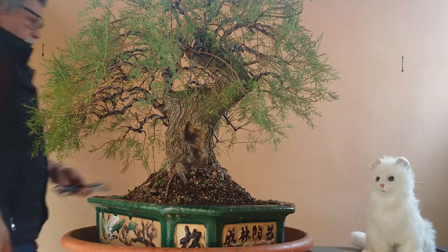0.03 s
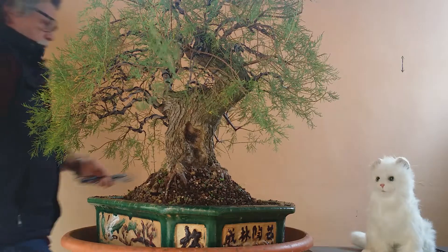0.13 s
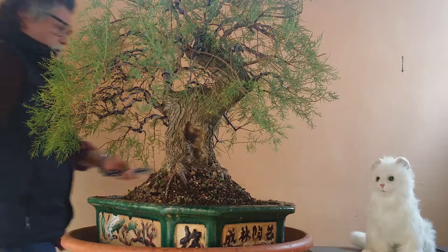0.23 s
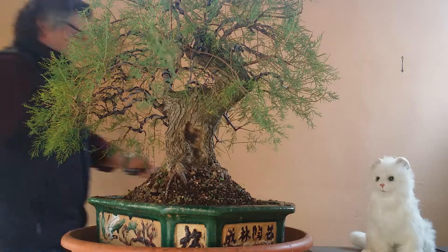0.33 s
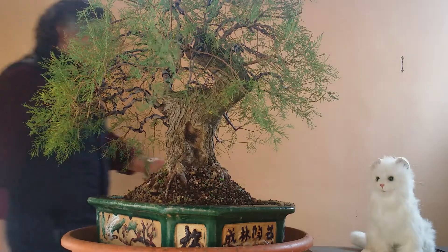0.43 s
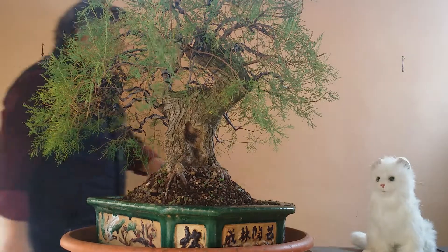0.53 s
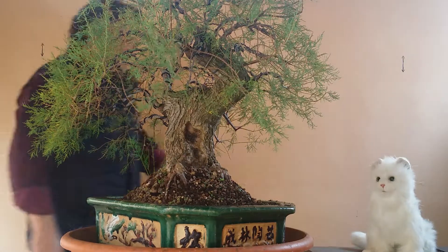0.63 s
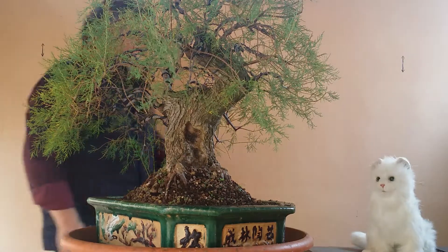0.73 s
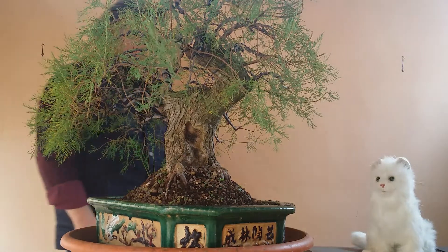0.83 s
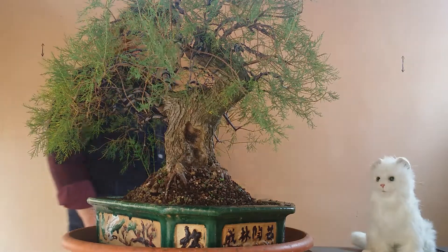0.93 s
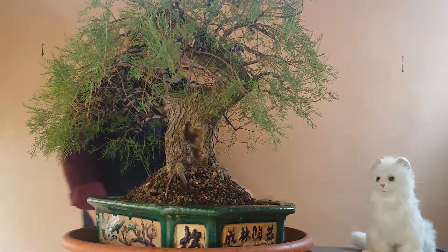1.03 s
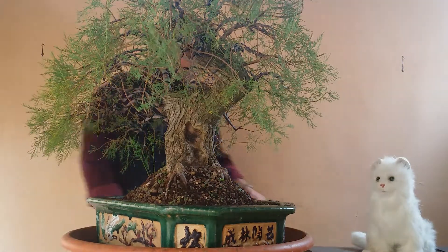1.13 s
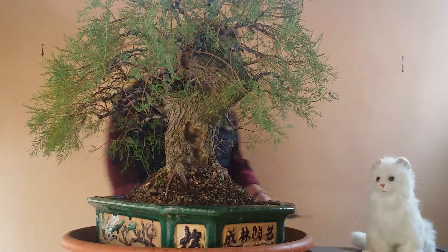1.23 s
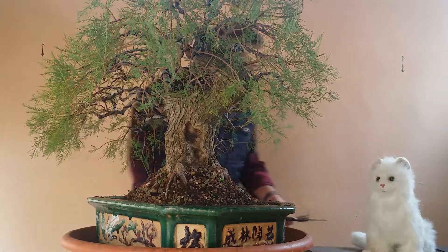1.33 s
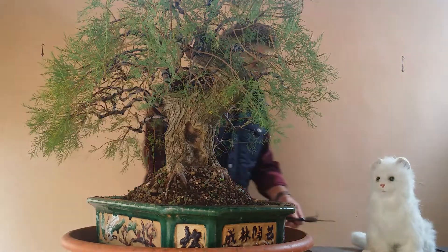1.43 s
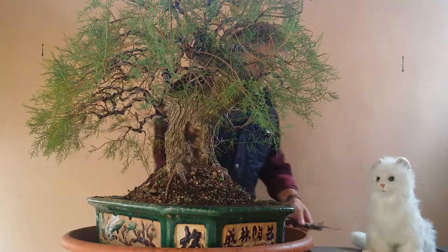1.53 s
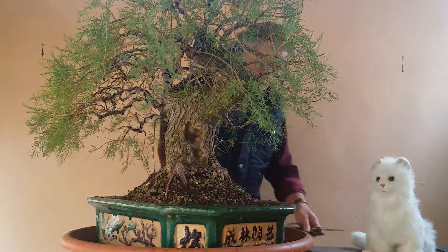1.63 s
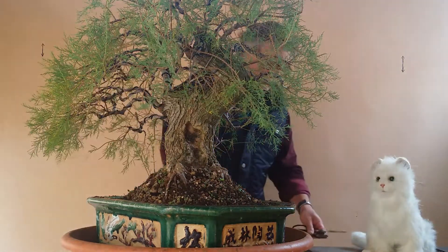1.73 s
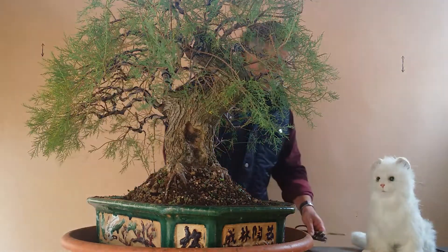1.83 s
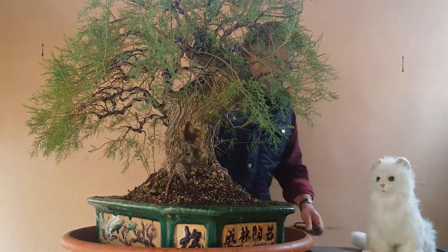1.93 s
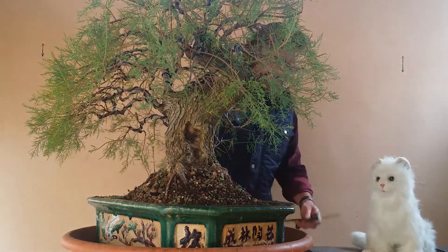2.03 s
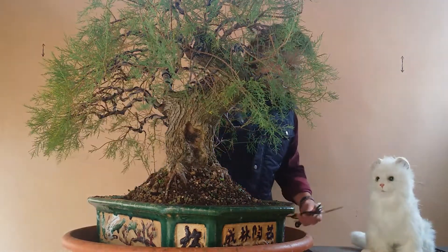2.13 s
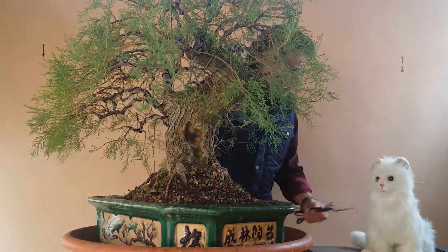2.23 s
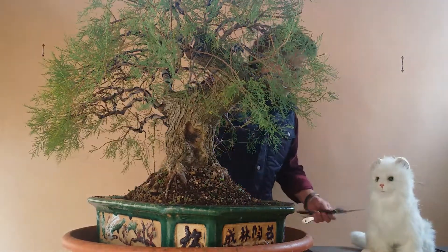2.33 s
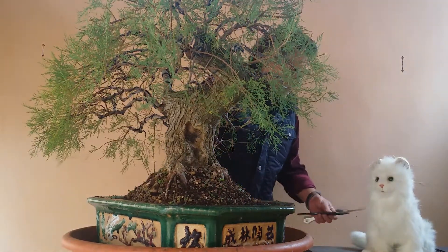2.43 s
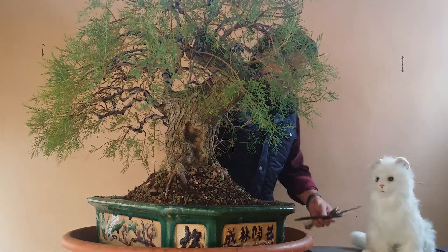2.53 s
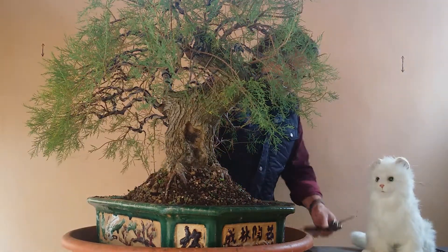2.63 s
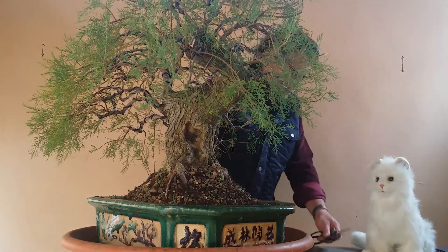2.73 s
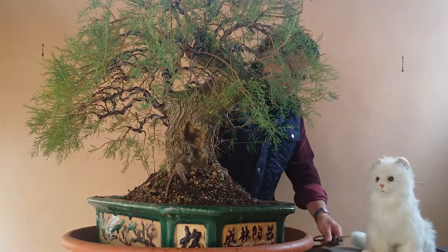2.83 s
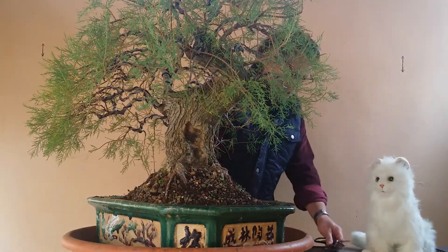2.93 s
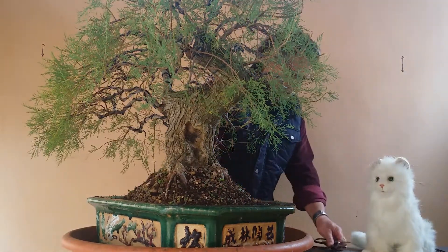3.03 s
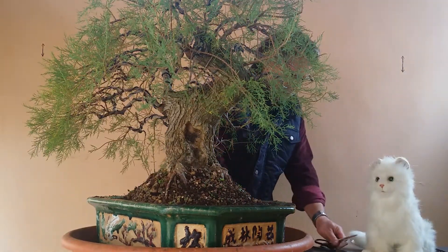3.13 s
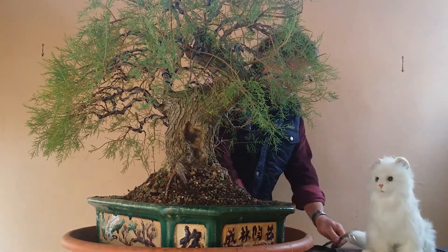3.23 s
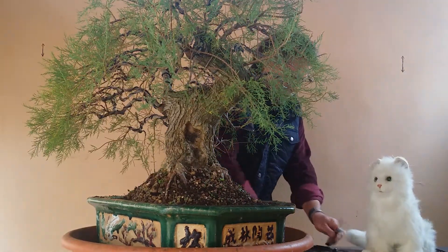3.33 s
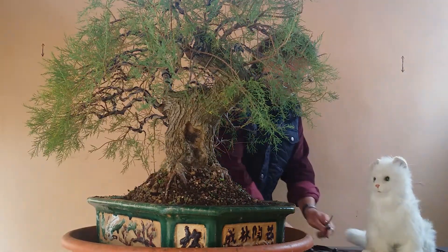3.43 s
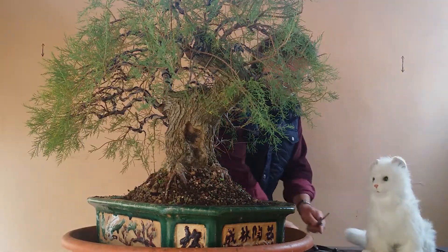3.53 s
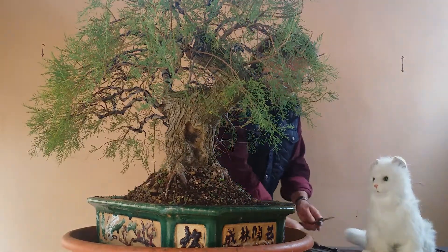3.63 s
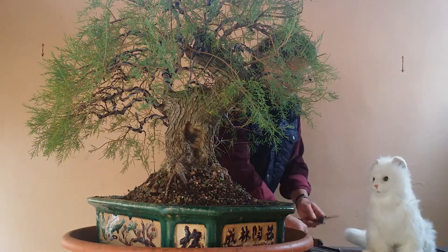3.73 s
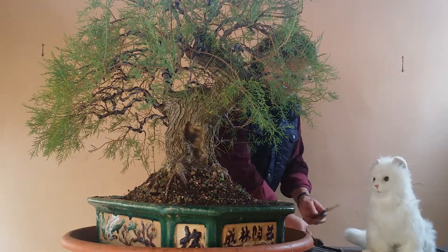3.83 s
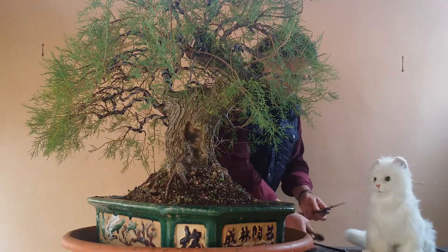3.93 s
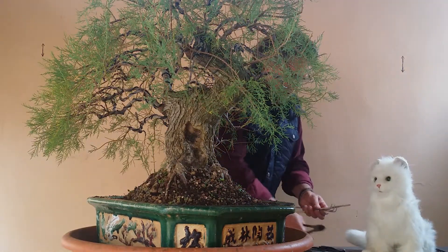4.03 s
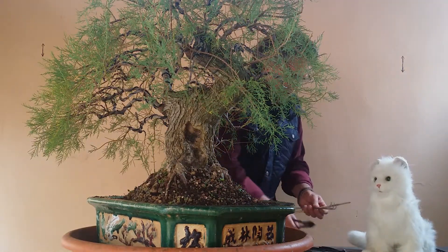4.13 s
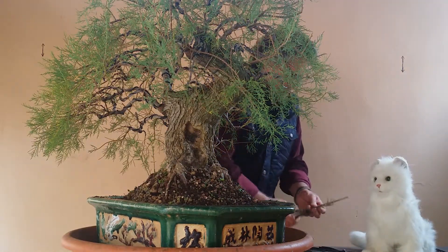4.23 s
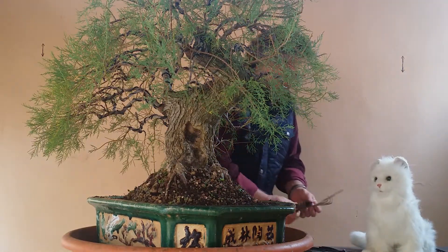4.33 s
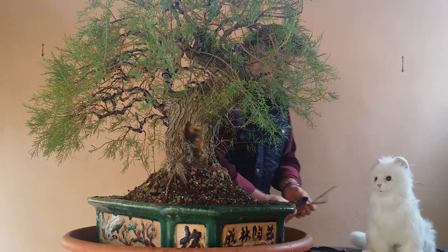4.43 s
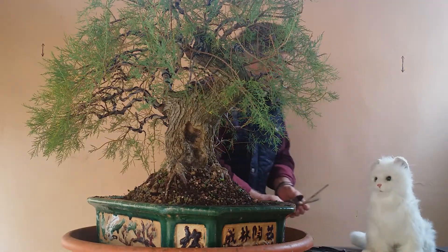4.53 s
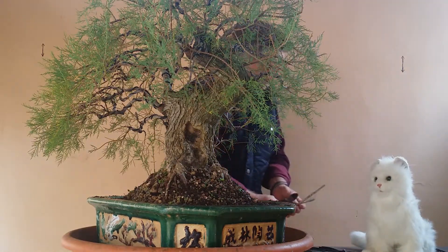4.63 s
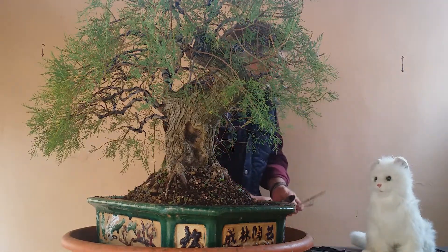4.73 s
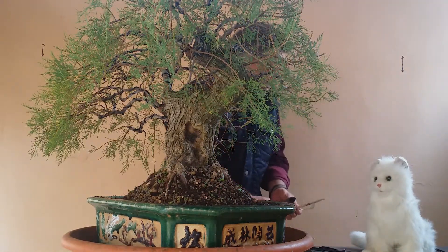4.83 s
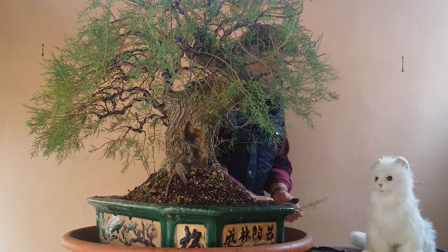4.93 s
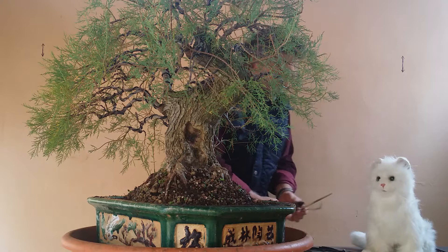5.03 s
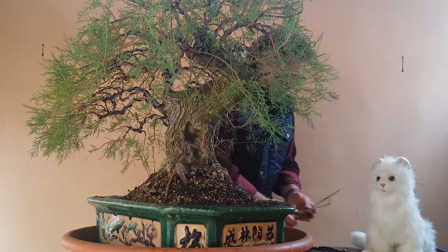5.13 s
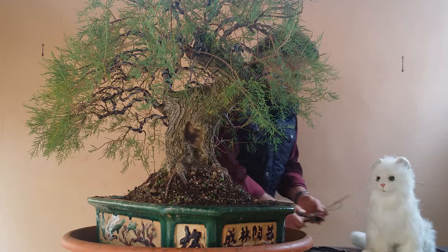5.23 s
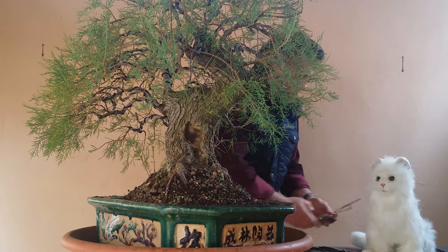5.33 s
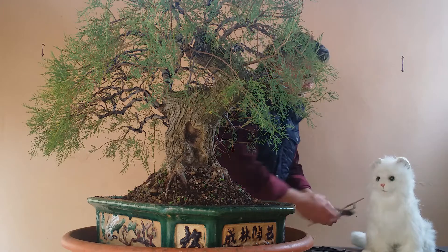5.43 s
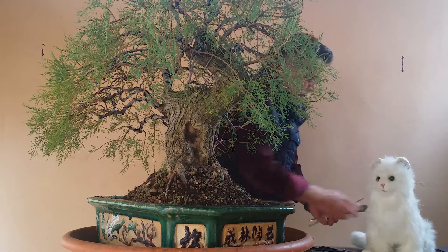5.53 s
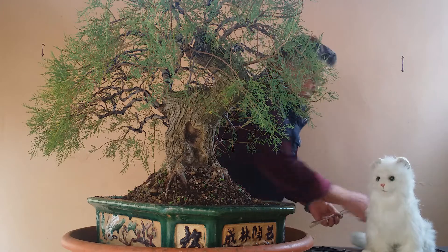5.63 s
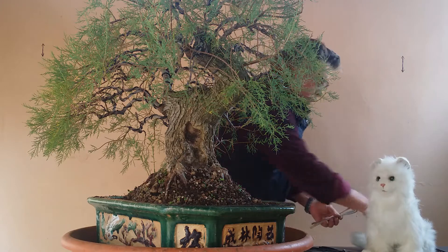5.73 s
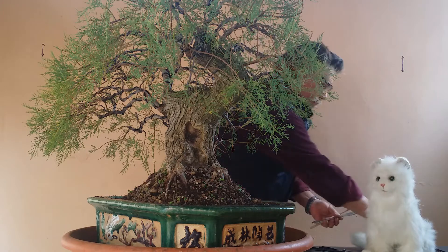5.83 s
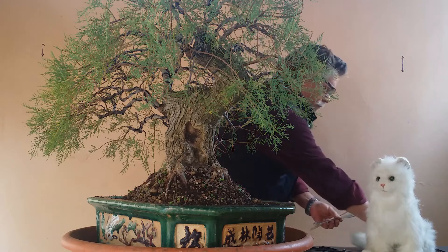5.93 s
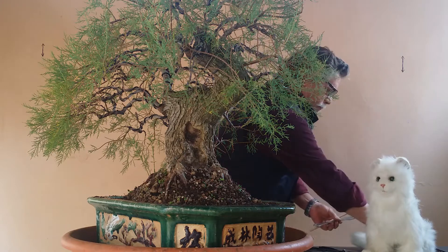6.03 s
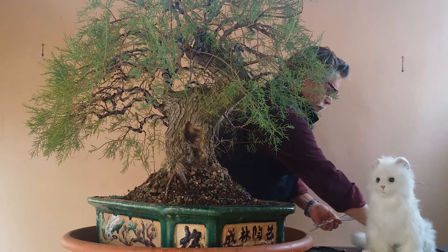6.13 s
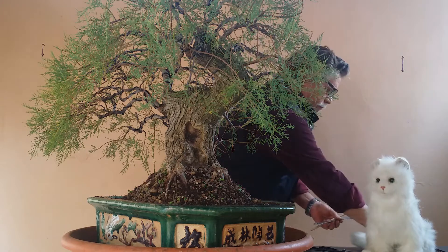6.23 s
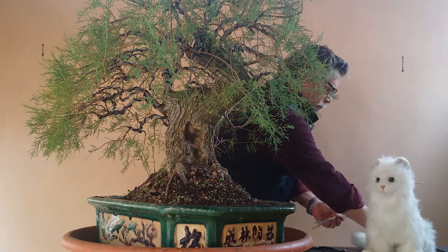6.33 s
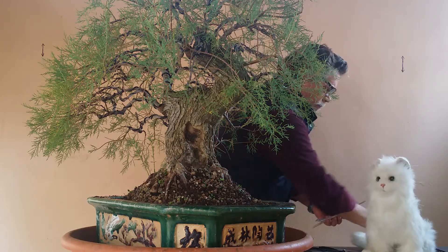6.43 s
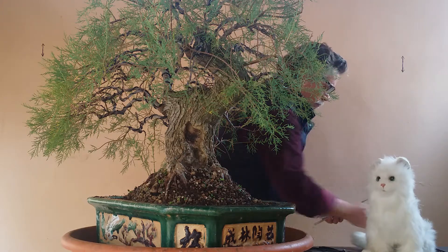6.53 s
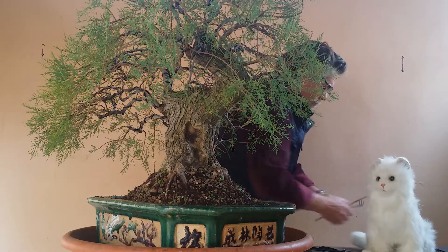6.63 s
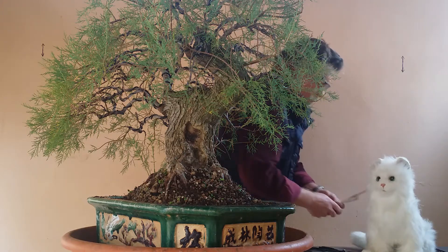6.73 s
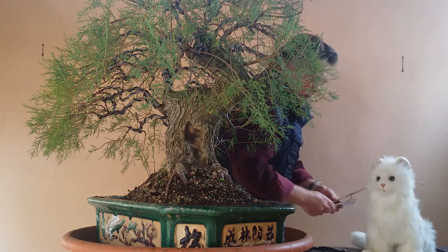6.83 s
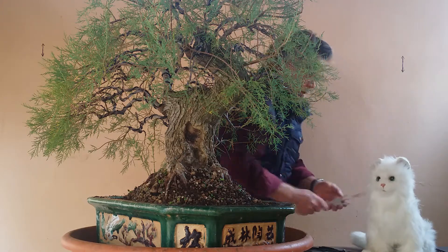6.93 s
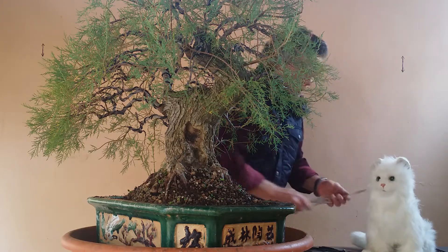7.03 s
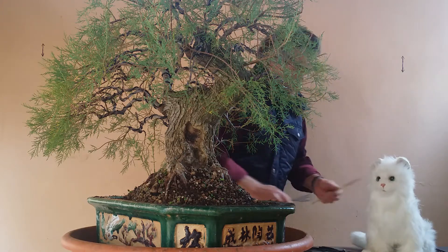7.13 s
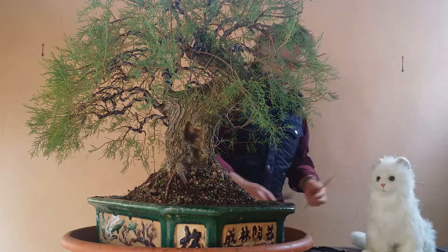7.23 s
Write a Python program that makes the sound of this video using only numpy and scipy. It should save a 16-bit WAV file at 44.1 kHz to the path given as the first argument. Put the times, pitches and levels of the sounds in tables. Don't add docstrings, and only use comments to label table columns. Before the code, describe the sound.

In a quiet bare room, small steel hand tools clink faintly, land on a wooden table, are lifted, slid together, then knocked sharply and loudly.

```python
import sys
import numpy as np
from scipy import signal
from scipy.fft import rfft, irfft, next_fast_len
from scipy.io import wavfile
from scipy.ndimage import uniform_filter1d, map_coordinates

SR = 44100
rng = np.random.default_rng(int(sys.argv[2]) if len(sys.argv) > 2 else 0)


def put_to_file(sound):
    columns = np.atleast_2d(sound).T
    safe = np.clip(columns, -1, 1)
    whole_steps = np.round(safe * 32767)
    wavfile.write(sys.argv[1], SR, whole_steps.astype(np.int16))


def linear_from_db(decibels):
    return 10 ** (np.asarray(decibels, float) / 20)


N = 321841

# frequency in Hz, density in dB per Hz.
RUMBLE_SPECTRUM = [(12, -34), (20, -5.5), (59, -4), (97, 1.5), (139, -5), (308, -7), (375, -12.5),
                   (450, -12), (580, -49), (990, -120)]
# frequency in Hz, density in dB per Hz.
SHUFFLE_SPECTRUM = [(240, -22.5), (400, -10), (533, -5.5), (575, -6), (945, -7), (3000, -17), (3900, -38),
                    (6600, -120)]
# frequency in Hz, density in dB per Hz.
AIR_SPECTRUM = [(1530, -25.5), (2600, -26.5), (3070, -7.5), (3940, -4.5), (4280, -5), (5620, -5.5),
                (6480, 0), (6990, -5), (8010, -7), (11100, -12.5), (14800, -15), (15800, -7.5)]
# frequency in Hz, left-right likeness from -1 to 1.
BACKGROUND_ALIKE = [(60, 1), (180, 0.95), (550, 0.59), (1650, -0.1), (4970, 0.011), (15000, -0.01)]
# time in seconds, movement in dB.
MOVEMENT = [(0, 7.5), (.15, 4.5), (.3, 2.5), (.77, 1), (1.1, 2), (1.4, -0.7), (1.65, 1), (1.85, -3),
            (2.15, -0.95), (3.1, -1.15), (3.6, -1.2), (3.95, 5), (4.4, 2), (4.7, 0), (5.0, 8), (5.25, -1.5),
            (6.2, -1), (7.3, -0.3)]
# frequency in Hz, t60 in seconds.
WALL_DECAY = [(80, 0.49), (170, 0.35), (500, 0.36), (1500, 0.32), (5000, 0.27), (12000, 0.26)]
# frequency in Hz, left-right likeness from -1 to 1.
WALL_ALIKE = [(100, 0.88), (250, 0.99), (600, 0.75), (1200, 0.16), (3000, .1)]

# start in seconds, level in dB, thud over it in dB,
# steel over it in dB, landing time in ms.
CLINKED = [
    (.004, -51.5, -20, -2, 2.1),
    (.131, -47.5, -25, 10, 0.42),
    (.198, -53, -20, -7, .6),
    (.220, -47.5, -20, 0.5, 0.42),
]
# start in seconds, level in dB, thud in dB, steel in dB, landing time in ms.
CARRIED = [
    (.818, -53, -20, 2.5, 7.5),
    (.836, -50.5, -29, 9.5, 14),
    (.869, -37, -14, 2, 0.44),
    (1.228, -52, 0, -1, 3.9),
    (1.66, -56, -19, 2, 14),
    (2.640, -53, -20, -0.5, 1.6),
]
# start in seconds, level in dB, thud in dB, steel in dB,
# landing time in ms.
LAID = [
    (.52, -45.5, -6.5, -22, 30),
    (1.095, -64, 11, -26, 11),
    (1.563, -49.5, -1, -15, 6.6),
    (3.154, -24.5, -12.5, -12, 9.4),
    (3.542, -41.5, -22, -20, 8),
    (3.70, -46.5, -11, -20.5, 25),
    (3.905, -38, -1, -35, 20),
    (4.831, -46, -3.5, -31, .5),
]
# start in seconds, level in dB, thud in dB, steel in dB, landing time in ms.
TAPPED = [
    (2.752, -29.5, -26, -32, 8),
    (2.761, -32.5, -9.5, -19.5, 3),
    (2.88, -60, 7, 2, 9.5),
    (3.07, -52.5, 2, -2.5, 8.9),
]
# start in seconds, level in dB, thud in dB, steel in dB, landing time in ms.
DROPPED = [
    (3.251, -13, -32, -14.5, 13),
    (3.305, -31, -1.5, -8.5, 9),
]
# start in seconds, level in dB, thud in dB, steel in dB, landing time in ms.
SETTLED = [
    (3.342, -35, -9, -23, 6),
    (3.945, -43, -0.5, -30, 24.6),
    (4.218, -45, -6, -30, 2.3),
    (4.806, -59, -10, -30, 1.47),
    (5.055, -52, -15, -30, 1.6),
]
# start in seconds, level in dB, thud in dB, steel in dB, landing time in ms.
LIFTED = [
    (4.0555, -15.5, -16.5, -8.5, 7),
    (4.10, -24.5, -14, -13.5, 9),
]
# start in seconds, level in dB, thud in dB, steel in dB, landing time in ms.
TOUCHED = [
    (4.866, -52.5, -22, 4.4, .5),
]
# start in seconds, level in dB, thud in dB, steel in dB, landing time in ms.
NUDGED = [
    (6.10, -66.5, -9.5, -28.5, 23),
    (6.872, -55.5, -28, -30, 3),
]
# start in seconds, level in dB, thud in dB, steel in dB, landing time in ms.
TIPPED = [
    (6.325, -14, -19.5, -40.5, 0.51),
]
# start in seconds, level in dB, thud in dB, steel in dB, landing time in ms.
SORTED = [
    (6.351, -6, -12, -30, 1.5),
    (6.373, -11, -10, -29, 4),
]

# frequency in Hz, density in dB per Hz.
HELD_BODY = [(880, -18), (1500, -4), (2970, 10), (3440, 5.5), (4140, 8.5), (12600, -17), (13900, -57),
             (14500, -16), (15500, -72)]
# frequency in Hz, density in dB per Hz.
LAID_BODY = [(130, -35), (220, -4), (306, -6.5), (559, 2.5), (778, -9.5), (1100, -3.5), (1400, -14.5),
             (1690, -10), (2190, -19.5), (2790, -23), (3560, -24), (6800, -25.5), (8840, -50),
             (15000, -120)]
# frequency in Hz, density in dB per Hz.
TAPPED_BODY = [(150, -64), (250, -30), (507, 2), (717, -22.5), (945, -10.5), (1290, -19), (1590, -20.5),
               (1730, -27.5), (3060, -18.5), (3890, -32), (5690, -30), (9720, -40.5), (15500, -58.5)]
# frequency in Hz, density in dB per Hz.
DROPPED_BODY = [(130, -39), (220, -15), (326, -18), (412, -6), (450, -1.5), (783, -11.5), (920, -1),
                (1020, -7), (1320, -5), (1770, -7), (2180, -5), (4200, -17.5), (7200, -23), (9360, -47),
                (15800, -120)]
# frequency in Hz, density in dB per Hz.
LIFTED_BODY = [(110, -29), (180, -16), (239, -2), (300, -18), (393, -0.5), (456, -13.5), (499, -3),
               (625, -4.5), (1160, -9), (1230, -7.5), (1760, -11.5), (2980, -8), (6500, -24), (8450, -52),
               (14300, -120)]
# frequency in Hz, density in dB per Hz.
NUDGED_BODY = [(500, -30), (950, -6), (1300, -25), (2300, -21), (2700, -5), (3200, -13), (5000, -19),
               (9000, -41.5)]
# frequency in Hz, density in dB per Hz.
TIPPED_BODY = [(150, -42), (250, -10), (372, 2.5), (768, 0), (1250, 10), (3330, -11), (3700, -11),
               (6540, -23), (7510, -23), (15500, -37.5)]
# frequency in Hz, density in dB per Hz.
SORTED_BODY = [(150, -37), (250, -17), (292, -31.5), (353, 8.5), (434, -3.5), (755, -3.5), (1120, -1.5),
               (1250, -3.5), (2240, -0.5), (5220, -17.5), (7130, -21), (15500, -55.5)]
# frequency in Hz, width in Hz, gain in dB.
TABLE_MODES = [(169.5, 40, -0.5), (359, 22, -7.5)]

# frequency in Hz, level in dB, t60 in seconds.
PLIERS = [(2050, -19, 0.033), (3700, -22, 0.027), (5000, -16, 0.092), (5960, -3.5, .03), (7585, -1, 0.046),
          (8470, -19, .04), (10000, -12, 0.034), (10700, -31, 0.027), (12200, -10, .04), (15000, -17, .03)]
# frequency in Hz, level in dB, t60 in seconds.
SCISSORS = [(1950, -9.5, 0.058), (3020, -1, 0.02), (3680, -16, 0.024), (5300, -9, 0.03), (5820, 3.5, .05),
            (7120, 6, 0.02), (7600, 10, 0.02), (8750, -10, 0.081), (9600, 0.5, 0.05), (11200, -11, 0.027),
            (12100, 3, 0.068), (15150, -10, .04)]
# frequency in Hz, level in dB, t60 in seconds.
CUTTER = [(5010, -5.5, 0.06), (5640, -4, 0.07), (6910, -4, 0.061), (7740, 3.5, 0.034), (8450, -11, 0.033),
          (8970, -2.5, 0.029), (9760, -8, 0.04), (10340, -9, 0.056), (11100, -12, 0.027),
          (10880, -6, 0.025), (11740, -8, 0.027), (12420, -17.5, .03), (13500, -7.5, 0.039),
          (13950, -5.5, 0.027)]
# frequency in Hz, level in dB, t60 in seconds.
TWEEZERS = [(5070, 4, 0.035), (6900, -1, .04), (9660, -8, .03), (11000, -10, .03)]
# frequency in Hz, level in dB, t60 in seconds.
LOOSE = [(7370, -2, 0.025), (8350, -4, .015), (8900, -10, .015), (12000, -8.5, 0.035)]

# middle in seconds, length in seconds, level in dB, pitch in Hz.
RUBS = [(1.7, 0.22, -67.5, 3440), (2.07, .1, -67, 5000), (2.12, .12, -67.5, 4000), (2.46, 0.15, -69, 3960),
        (4.33, 0.23, -65, 2450), (4.4, .14, -66, 4600), (4.54, 0.034, -63, 4600), (4.67, 0.31, -64, 4360),
        (4.75, .35, -66, 1700), (5.95, .35, -76, 3800), (6.08, 0.13, -63.5, 960), (6.92, 0.19, -70.5, 3630),
        (7.08, 0.32, -71.5, 1740), (7.25, 0.15, -65, 4280)]
# frequency in Hz, density in dB per Hz.
SLIDE_SPECTRUM = [(180, -32.5), (300, -8), (500, 4), (590, -20), (674, -20), (1390, -13), (1670, -5.5),
                  (3810, -8.5), (4280, -8), (5130, -0.5), (15500, -22.5)]
# frequency in Hz, width in Hz, gain in dB.
SLIDE_MODES = [(1670, 58, -3), (3770, 160, 0.5), (5120, 140, -2), (6600, 200, 0)]

# (sudden landing, lost per ms of landing)
IN_HAND_DB, JINGLING_DB, ON_WOOD_DB = (15, 1.8), (6.5, -0.5), (0.28, 0.0044)
RUMBLE_DB, SHUFFLE_DB, AIR_DB = -58.5, -62, -63.5
RUMBLE_GROWS, SHUFFLE_GROWS, AIR_GROWS = .5, 1.1, 0.93
WALK_DB, WALK_ENDS_S = 2.5, 1.5
SHAKE_DB, SHAKE_RISE_S, SHAKE_T60_S = -33, 0.037, 0.63
RUB_SHARP = 4.1
SLIDE_PEAK_S, SLIDE_PEAK_DB = 5.0, -49
SLIDE_SWELL_S, SLIDE_FADE_S = .09, 0.083


def unit(x):
    return x / np.sqrt(np.mean(x ** 2) + 1e-20)


def along(points, hz):
    f, v = np.transpose(points)
    return np.interp(np.log(hz + 1), np.log(f + 1), v)


def curve(rows):
    s, value = np.transpose(rows)
    return np.interp(np.arange(N) / SR, s, value)


def wobble(rate_hz):
    knots = rng.standard_normal(int(N * rate_hz / SR) + 4)
    return map_coordinates(knots, [np.arange(N) * rate_hz / SR])


def filtered(x, response):
    n = x.shape[-1]
    m = next_fast_len(n + 8192)
    return irfft(rfft(x, m) * response(np.fft.rfftfreq(m, 1 / SR)), m)[..., :n]


def resonances(peaks):
    def response(f):
        total = 0
        for k, (center_hz, width_hz, db) in enumerate(peaks):
            damping = 1j * f * width_hz
            total = total + (-1) ** k * linear_from_db(db) * damping / (center_hz ** 2 - f * f + damping)
        return total
    return response


def left_right(pair, alike):
    def mid_side_gains(hz):
        turn = np.arccos(np.clip(along(alike, hz), -1, 1)) / 2
        return np.array([np.cos(turn), np.sin(turn)])
    mid, side = filtered(pair, mid_side_gains)
    return np.array([mid + side, mid - side])


def evened(x, smooth_hz):
    z = rfft(x)
    span = max(1, round(smooth_hz * x.shape[-1] / SR))
    power = uniform_filter1d(abs(z) ** 2, span, axis=-1)
    return irfft(z / np.sqrt(power + 1e-12), x.shape[-1])


def rush(spectrum, patchy_db):
    z = signal.stft(rng.standard_normal((2, N)), nperseg=512)[2]
    field = uniform_filter1d(rng.standard_normal(z.shape[1:]), 6, 0)
    field = uniform_filter1d(field, 14, 1)
    pair = signal.istft(z * linear_from_db(patchy_db * unit(field)), nperseg=512)[1][:, :N]
    return unit(filtered(left_right(pair, BACKGROUND_ALIKE), lambda hz: linear_from_db(along(spectrum, hz))))


def background():
    move_db = curve(MOVEMENT)
    walk_db = curve([(WALK_ENDS_S - .6, WALK_DB), (WALK_ENDS_S + 0.58, 0)])
    rumble_gain = linear_from_db(RUMBLE_DB + walk_db + RUMBLE_GROWS * move_db + 1.8 * wobble(5.5))
    shuffle_gain = linear_from_db(SHUFFLE_DB + SHUFFLE_GROWS * move_db + 1.6 * wobble(4.1))
    air_gain = linear_from_db(AIR_DB + AIR_GROWS * move_db + 0.27 * wobble(5.3))
    rumble = (rumble_gain + shaking()) * rush(RUMBLE_SPECTRUM, patchy_db=1.6)
    shuffle = shuffle_gain * rush(SHUFFLE_SPECTRUM, patchy_db=1.5)
    return rumble + shuffle + air_gain * rush(AIR_SPECTRUM, patchy_db=1.54)


def struck(gain_db, n):
    c = irfft(np.maximum(gain_db, -90) * np.log(10) / 20)
    c[1:len(c) // 2] *= 2
    c[len(c) // 2 + 1:] = 0
    h = irfft(np.exp(rfft(c)))[:n]
    return h / np.linalg.norm(h)


def pushes(land_ms):
    push = np.zeros(SR // 20)
    when = np.sort(rng.random(7))
    at = np.round((when - when[0]) * land_ms * SR / 1000).astype(int)
    np.add.at(push, at, .3 + when)
    lead = 400
    return np.roll(evened(np.roll(push, lead), smooth_hz=60), -lead)[:-lead]


def contact(thud_db, bright_db, steel_db, land_ms, body, steel):
    t = np.arange(SR // 5) / SR
    hz = np.fft.rfftfreq(2 ** 14, 1 / SR)
    push = pushes(land_ms)
    wood = struck(along(body, hz) + bright_db * np.log2(hz / 1000 + .01), len(t))
    thud = filtered(1. * (t == 0), lambda f: resonances(TABLE_MODES)(f) ** 2)
    ring = np.zeros(len(t))
    for f, db, t60_s in steel:
        ring += linear_from_db(db + rng.normal(0, 2.5) - 60 * t / t60_s) * np.sin(2 * np.pi * f * t)
    blow = np.zeros(len(t))
    for db, part in [(0, wood), (thud_db, thud), (steel_db, ring)]:
        pushed = signal.fftconvolve(part, push)[:len(t)]
        blow += linear_from_db(db) * pushed / np.linalg.norm(pushed)
    return blow


def walls(build_s):
    hz, t, z = signal.stft(rng.standard_normal((2, SR // 2)), SR, nperseg=256)
    decay = linear_from_db(-60 * t / along(WALL_DECAY, hz)[:, None])
    tail = signal.istft(z * decay, SR, nperseg=256)[1]
    build = 1 - np.exp(-np.arange(tail.shape[1]) / SR / build_s)
    tail = left_right(tail, WALL_ALIKE) * build
    tail = evened(tail, smooth_hz=350)[:, :-400]
    return tail / np.linalg.norm(tail[0])


def tools():
    out = np.zeros((2, N + 2 * SR))
    kinds = [(CLINKED, HELD_BODY, PLIERS, JINGLING_DB),
             (LAID, LAID_BODY, CUTTER, ON_WOOD_DB),
             (CARRIED, HELD_BODY, SCISSORS, IN_HAND_DB),
             (TAPPED, TAPPED_BODY, CUTTER, ON_WOOD_DB),
             (DROPPED, DROPPED_BODY, CUTTER, ON_WOOD_DB),
             (SETTLED, LAID_BODY, LOOSE, ON_WOOD_DB),
             (LIFTED, LIFTED_BODY, CUTTER, ON_WOOD_DB),
             (TOUCHED, HELD_BODY, TWEEZERS, ON_WOOD_DB),
             (NUDGED, NUDGED_BODY, LOOSE, ON_WOOD_DB),
             (TIPPED, TIPPED_BODY, LOOSE, ON_WOOD_DB),
             (SORTED, SORTED_BODY, LOOSE, ON_WOOD_DB)]
    for table, body, steel, (sudden_db, lost_db) in kinds:
        for s, db, thud_db, steel_db, land_ms in table:
            bright_db = sudden_db - lost_db * land_ms
            blow = linear_from_db(db + 24.5) * contact(thud_db, bright_db, steel_db, land_ms, body, steel)
            heard = signal.fftconvolve(blow[None], walls(build_s=0.0019), axes=1)
            heard[1, :len(blow)] += linear_from_db(-5.0) * blow
            heard[0, 4:len(blow) + 4] += linear_from_db(-7) * blow
            out[:, round(s * SR):][:, :heard.shape[1]] += heard
    return out[:, :N]


def rubs():
    out = np.zeros((2, N + SR))
    t = np.arange(SR // 2) / SR - 1 / 4
    for s, length_s, db, hz in RUBS:
        swell = np.cos(np.pi / 2 * np.clip(t / length_s, -1, 1)) ** 2
        grain = rng.standard_normal((2, len(t))) * swell
        band = resonances([(hz, hz / RUB_SHARP, 0)])
        rub = filtered(grain, lambda f: band(f) ** 2) * np.sqrt(SR * RUB_SHARP / hz / 2)
        out[:, round((s - 1 / 4) * SR):][:, :len(t)] += linear_from_db(db) * rub
    return out[:, :N]


def shaking():
    gain = np.zeros(N)
    for s, db, *_ in DROPPED + LIFTED + SORTED:
        since_s = np.maximum(np.arange(N) / SR - s, 0)
        rise = 1 - np.exp(-since_s / SHAKE_RISE_S)
        gain += linear_from_db(db + SHAKE_DB - 60 * since_s / SHAKE_T60_S) * rise
    return gain


def slide():
    t = np.arange(N) / SR - SLIDE_PEAK_S
    span_s = np.where(t < 0, SLIDE_SWELL_S, SLIDE_FADE_S)
    level_db = SLIDE_PEAK_DB - 10 * abs(t / span_s) ** 2.6
    slips = rng.standard_normal((2, N)) * linear_from_db(1.2 * wobble(300))
    ring = resonances(SLIDE_MODES)
    steel = filtered(slips, lambda hz: linear_from_db(along(SLIDE_SPECTRUM, hz)) * (0.38 + abs(ring(hz))))
    return linear_from_db(level_db + 4.5) * unit(steel)


def scene():
    return (background() + tools() + rubs() + slide()) * linear_from_db([[-.9], [.9]])


def top_cut(x):
    return signal.sosfilt(signal.butter(12, 16160, fs=SR, output="sos"), x)


def record(dry):
    limited = dry / (1 + abs(dry) ** 6) ** (1 / 6)
    mix = filtered(limited, lambda hz: hz < 15750)
    return top_cut(mix)


dry = scene()
out = record(dry)
put_to_file(out)
```